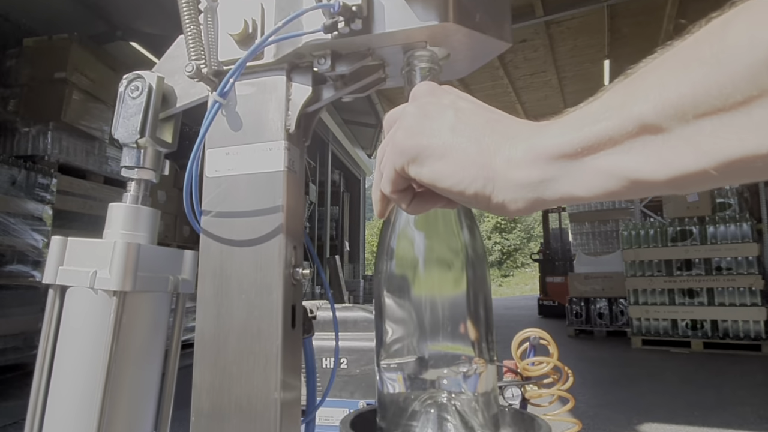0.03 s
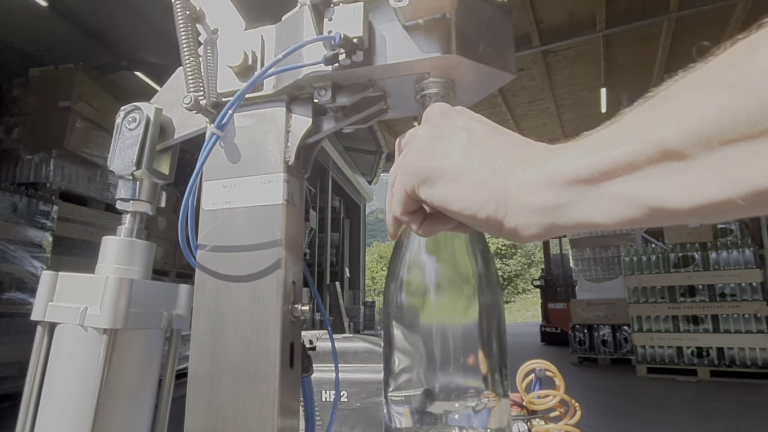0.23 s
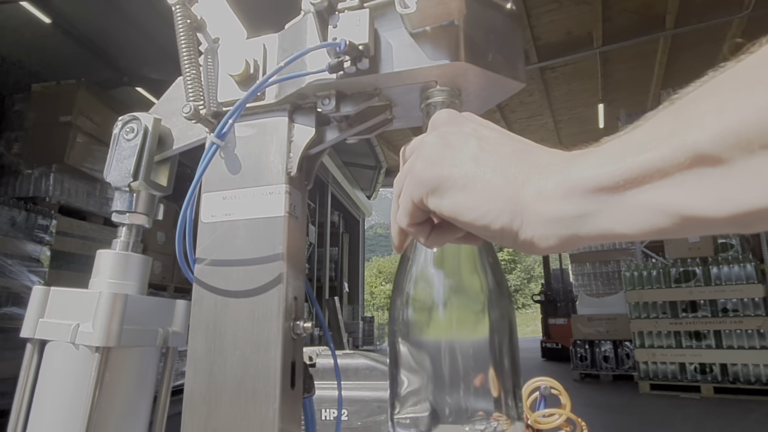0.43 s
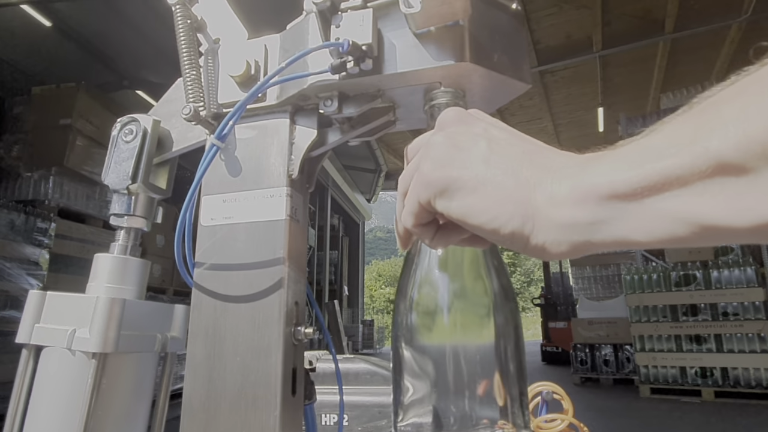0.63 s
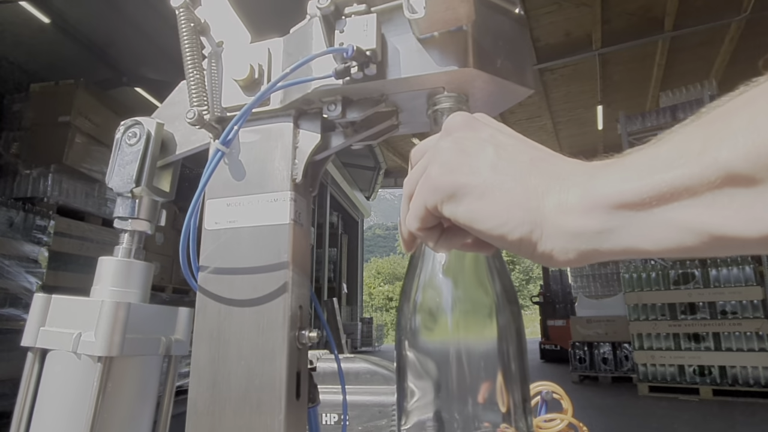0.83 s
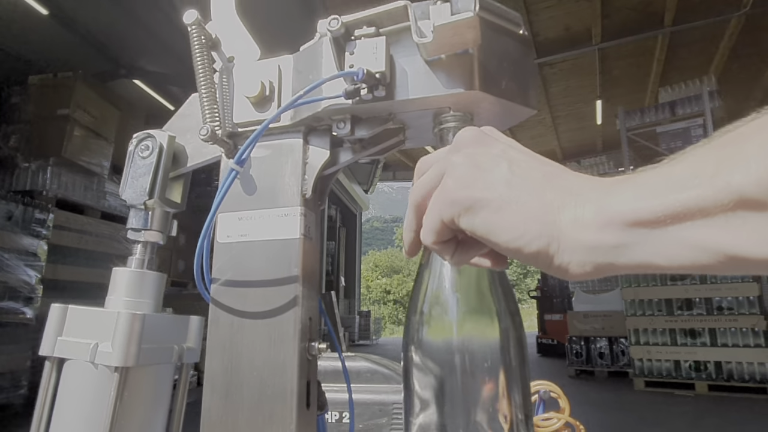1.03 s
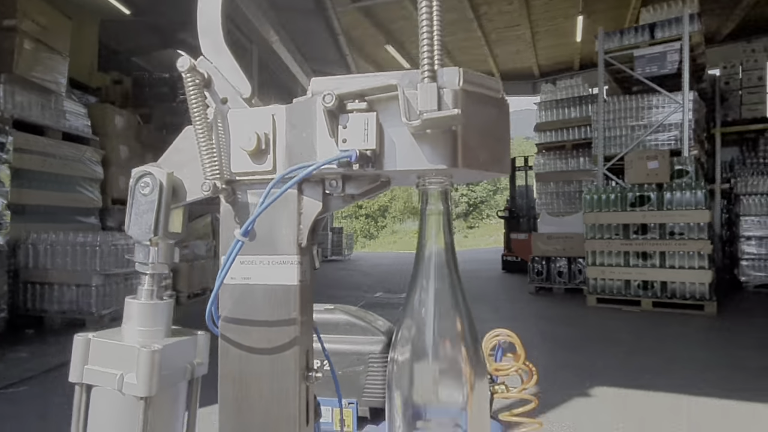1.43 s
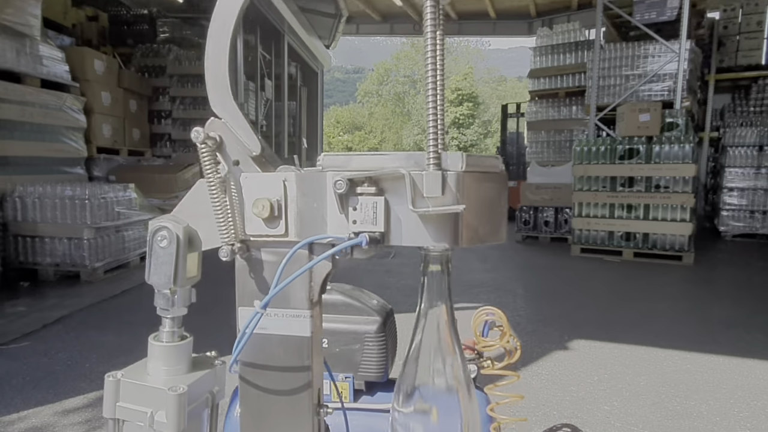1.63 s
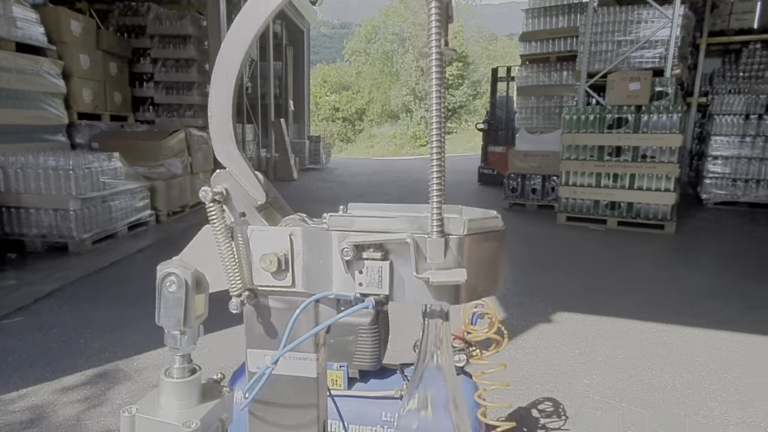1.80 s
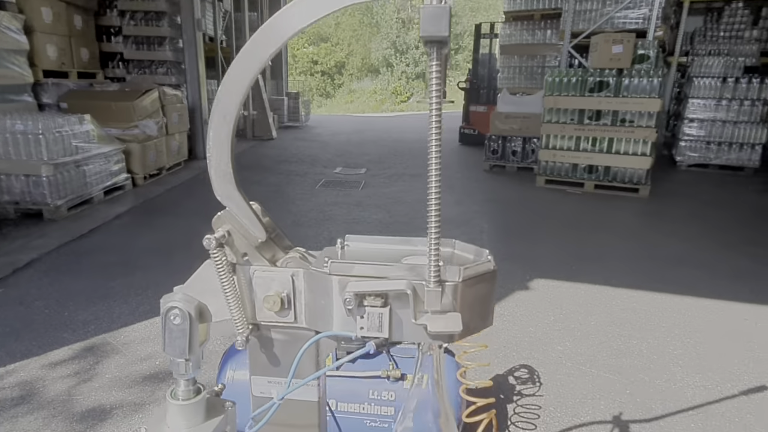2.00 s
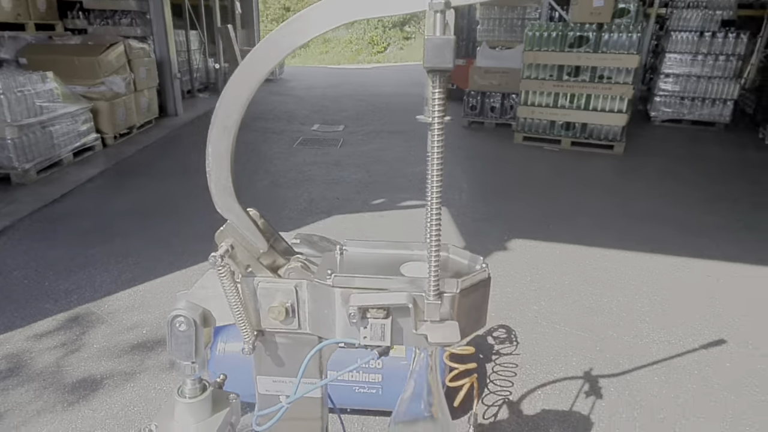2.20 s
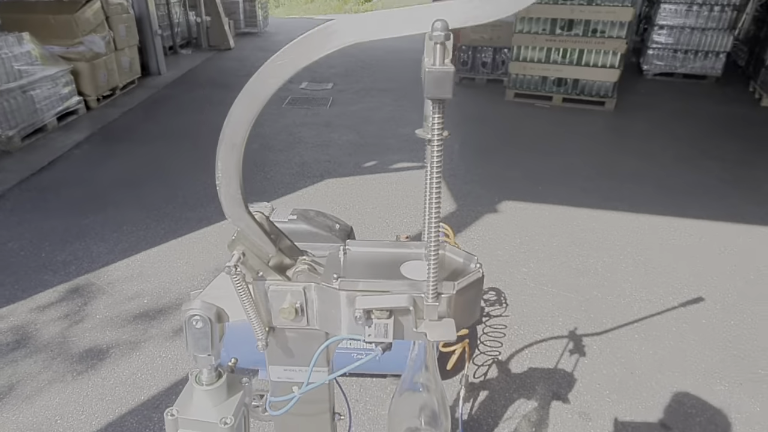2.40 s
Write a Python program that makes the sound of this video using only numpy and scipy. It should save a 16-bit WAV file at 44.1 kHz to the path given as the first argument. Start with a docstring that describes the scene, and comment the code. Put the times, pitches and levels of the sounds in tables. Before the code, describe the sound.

A glass bottle taps a steel machine and lands with a sharp, ringing knock at about 0.2 seconds, then clinks three times, settling by 0.6. From 1.1 to 1.7 seconds, valves release four soft, whistling puffs of air while a lever slides with a low rumble. Faint squeaks and light rattles follow from 2 to 2.5 seconds. Quiet outdoor noise and a low hum lie underneath.

```python
"""A glass bottle is set into a pneumatic steel machine at the open side of a storage hall.
Its impacts excite damped modes: it chatters against the steel head, lands with a knock that
rings the frame, and clinks three times as it settles. Valves puff air that hisses and whistles
in the air line's resonances. A lever slides open with a friction rumble, its hinge squeaks and
loose parts rattle, all over outdoor noise, a low hum and a faint air leak."""
import sys
import numpy as np
from scipy import signal
from scipy.fft import rfft, irfft
from scipy.io import wavfile

SR = 44100
rng = np.random.default_rng(int(sys.argv[2]) if len(sys.argv) > 2 else 0)


def materialize(psi):
    """Save the field psi as 16-bit PCM at rate SR to the path in sys.argv[1].

    A 1-D psi becomes a single channel; in a 2-D psi each row is a channel.
    """
    bounded = np.clip(np.atleast_2d(psi).T, -1, 1)
    quanta = np.round(bounded * 32767).astype(np.int16)
    wavfile.write(sys.argv[1], SR, quanta)


N = 112454
T = np.arange(N) / SR
HZ = np.fft.rfftfreq(N, 1 / SR)

# likeness of left and right in a diffuse field (f/Hz, correlation)
DIFFUSE_CORRELATION = [(30, .93), (200, 0.93), (500, 0.72), (1200, 0.17), (3000, 0.067), (16000, 0.033)]
# reverberation time of the hall (f/Hz, T60/s)
HALL_DECAY = [(100, 1), (1000, 0.44), (4000, 0.27), (8000, 0.49), (16000, 0.34)]
# spectrum of the valve hiss and of the small ticks (f/Hz, level/dB)
BRIGHT_SPECTRUM = [(200, -13.5), (700, -8.5), (1400, -5.5), (2200, -5), (3100, 0.5), (4300, -2.5),
                   (5500, -7.5), (6700, -11), (8000, -20), (9200, -16.5), (10500, -25.5), (12000, -23),
                   (16000, -43.5)]


def amp(db):
    """Amplitude ratio of a level in decibels."""
    return 10 ** (np.asarray(db) / 20)


def unit(x):
    """Normalisation to rms 1."""
    return x / np.sqrt(np.mean(abs(x) ** 2) + 1e-20)


def read(points, hz):
    """Interpolation on a logarithmic frequency axis."""
    f, value = np.transpose(points)
    return np.interp(np.log(hz + 1), np.log(f + 1), value)


def add(mix, s, sound):
    """Superposition of a stereo sound onto the mix at time s."""
    part = mix[:, max(round(s * SR), 0):][:, :sound.shape[1]]
    part += sound[:, :part.shape[1]]


def pan(db):
    """Left and right gains for an interaural level difference."""
    return amp(np.array([[db], [-db]]) / 2)


def tilt(hz, db_per_octave):
    """Spectral slope in dB, pivoting at 3 kHz and flat below 1 kHz."""
    return db_per_octave * np.log2(np.maximum(hz, 1000) / 3000)


def noise(spectrum, correlation, slope=0):
    """Partly coherent stereo noise: the right side mixes the left with independent noise."""
    left, other = rfft(rng.standard_normal((2, N)))
    c = np.clip(correlation, -1, 1)
    right = c * left + np.sqrt(1 - c * c) * other
    return unit(irfft(np.array([left, right]) * amp(read(spectrum, HZ) + tilt(HZ, slope)), N))


def resonant(peaks):
    """Resonances (f/Hz, width/Hz, level/dB) driven by stereo white noise."""
    gain = sum(amp(db) / (1 + (2 * (HZ - hz) / width) ** 2) ** .75 for hz, width, db in peaks)
    return unit(irfft(rfft(rng.standard_normal((2, N))) * gain, N))


def wander(rate_hz):
    """Random modulation: bounded low-pass noise of rms near 1."""
    slow = irfft(rfft(rng.standard_normal(N)) / (1 + (HZ / rate_hz) ** 4), N)
    return np.clip(unit(slow), -2, 2)


def highpass(x, hz):
    """Third-order attenuation of the bass below hz."""
    return signal.sosfilt(signal.butter(3, hz, "high", fs=SR, output="sos"), x)


def click(spectrum, pan_db, lag_ms, slope=0, size=2048):
    """A minimum-phase impulse that arrives lag_ms later on the right."""
    hz = np.fft.rfftfreq(size, 1 / SR)
    log_gain = np.log(amp(read(spectrum, hz) + tilt(hz, slope)))
    response = np.exp(signal.hilbert(np.r_[log_gain, log_gain[-2:0:-1]]).conj())[:len(hz)]
    delay = np.exp(-2j * np.pi * hz * lag_ms / 1000)
    pulse = irfft(np.array([response, response * delay]))[:, :size // 2]
    return pan(pan_db) * pulse / abs(pulse).max()


def contacts(rows, spectrum, pan_db, lag_ms):
    """Impact transients, one click per row (t/s, level/dB, ..., slope/(dB/octave))."""
    out = np.zeros((2, N))
    for s, db, *_, slope in rows:
        add(out, s, amp(db) * click(spectrum, pan_db, lag_ms, slope))
    return out


def ring(modes, lag_ms):
    """Free vibration after a blow: a sum of exponentially damped modes."""
    t = np.maximum(T[:SR] - np.array([[0], [lag_ms / 1000]]), 0)
    return sum(pan(side) * amp(db - 60 * t / t60) * np.sin(2 * np.pi * hz * t)
               for hz, db, t60, side in modes)


def blows(rows, sound):
    """Linear response to repeated blows: the same sound at each (t/s, level/dB)."""
    out = np.zeros((2, N))
    for s, db in rows:
        add(out, s, amp(db) * sound)
    return out


def swells(rows):
    """Tones with random phase modulation under Gaussian envelopes."""
    out = np.zeros(N)
    for s, width, hz, db in rows:
        phase = 2 * np.pi * hz * T + hz / 2000 * wander(60) + 0.2 * wander(4.9)
        out += amp(db) * np.exp(-.5 * ((T - s) / width) ** 2) * np.sin(phase)
    return out


def echo(x, t60, delay_s):
    """Diffuse reverberation: convolution with decaying noise that fades in around delay_s."""
    diffuse = noise([(1, 0), (SR, 0)], read(DIFFUSE_CORRELATION, HZ))[:, :SR]
    hz, t, bands = signal.stft(diffuse, SR, nperseg=256)
    decay = amp(-60 * t / read(t60, hz)[:, None])
    tail = signal.istft(bands * decay, SR, nperseg=256)[1][:, :SR]
    tail *= np.clip(T[:SR] / delay_s - .5, 0, 1)
    return signal.fftconvolve(x[:1], tail / np.linalg.norm(tail[0]), axes=1)[:, :N]


def space(x, near_db, hall_db):
    """Direct sound, early reflections off the machine and late reverberation from the hall."""
    # decay of reflections among the machine's parts (f/Hz, T60/s)
    near_decay = [(100, 0.63), (1000, 0.21), (4000, 0.17), (16000, 0.11)]
    early = amp(near_db) * echo(x, near_decay, delay_s=0.00067)
    return x + early + amp(hall_db) * echo(x, HALL_DECAY, delay_s=0.06)


def background():
    """Diffuse outdoor noise, a hum modulated in amplitude and phase, and a faint air leak."""
    # spectra of the outdoor noise and of the leak (f/Hz, level/dB)
    yard_spectrum = [(20, -5), (50, 2), (80, -4.5), (125, -11.5), (180, -5.5), (250, -11.5), (330, -5.5),
                     (450, -15.5), (700, -15.5), (1200, -26.5), (2100, -23), (3600, -23.5), (6000, -33),
                     (9000, -48.5), (12000, -73.5), (16000, -68)]
    leak_spectrum = [(100, 3.5), (300, 6), (700, -3.5), (1500, -2), (3400, -4), (5000, -9.5), (7000, -14.5),
                     (9000, -18.5), (12000, -26), (16000, -44)]
    # harmonics of the hum (f/Hz, level/dB)
    harmonics = [(49, -55), (98, -62)]
    # envelope of the leak (t/s, level/dB)
    leak_envelope = [(0, -44.5), (.2, -53), (.75, -57), (1.1, -59.5), (1.75, -52), (1.95, -54), (2.2, -53),
                     (2.42, -50.5), (2.55, -52.5)]
    correlation = read(DIFFUSE_CORRELATION, HZ)
    outdoors = amp(-47.85 + 1.1 * wander(3.8)) * noise(yard_spectrum, correlation)
    hum = sum(amp(db) * (1 + .35 * wander(6)) * np.sin(2 * np.pi * hz * T + .6 * wander(3))
              for hz, db in harmonics)
    leak_db = np.interp(T, *np.transpose(leak_envelope)) + 0.44 * wander(30)
    return outdoors + hum + pan(db=1) * amp(leak_db) * noise(leak_spectrum, correlation)


def valves():
    """Escaping air excites resonances of the line and exhaust port; the line whistles and rings on."""
    # puffs of air (start/s, rise/s, hold/s, fall/(dB/s), hiss/dB, whistle/dB,
    # hiss slope/(dB/octave), line noise/dB, port noise/dB)
    puffs = [(-.03, 0.0046, 0.019, 166, -38.5, -58, -0.5, -56, -45.5),
             (1.118, 0.014, 0.046, 116, -39, -36, -0.5, -34, -53),
             (1.297, 0.0069, 0.02, 106, -42.5, -81, -1, -61, -53),
             (1.395, 0.035, 0.046, 130, -44.5, -62, 1.8, -51, -54),
             (1.543, 0.022, 0.055, 137, -41.5, -53.5, 2.5, -51, -39.5)]
    # modes of the air line (f/Hz, level/dB, left-right/dB, fall/(dB/s))
    line_modes = [(1685, -9, 0, 55), (2263, 1, 3, 135), (2471, 0, 2, 155), (3255, -14, 2, 110),
                  (3690, -13, 2, 110), (4007, -11, 3, 100), (4130, -14, 2, 110), (4467, -14, 2, 100),
                  (5000, -17, 2, 120), (5640, -22, 0, 130), (6650, -20, 0, 130), (6900, -22, 0, 130),
                  (9120, -26, 0, 130)]
    # resonances of the exhaust port (f/Hz, width/Hz, level/dB)
    port_resonances = [(1650, 28, -5), (2430, 50, -1), (2760, 170, -4), (3190, 150, -2), (3880, 60, -9),
                       (4540, 140, -12)]
    line_width_hz, flutter_depth = 40, .18
    tones = []
    for hz, db, side, ring_fall in line_modes:
        pair = [(1 + flutter_depth * wander(27)) * np.sin(2 * np.pi * hz * T + .5 * wander(19))
                for _ in range(2)]
        tones.append((pan(side) * amp(db) * np.array(pair), ring_fall))
    line = resonant([(hz, line_width_hz, db) for hz, db, *_ in line_modes])
    port = resonant(port_resonances)
    out = np.zeros((2, N))
    for start, rise, hold, fall, hiss_db, whistle_db, slope, line_db, port_db in puffs:
        opening = np.clip((T - start) / rise, 0, 1)
        closed_s = np.maximum(T - start - rise - hold, 0)
        hiss = noise(BRIGHT_SPECTRUM, correlation=0.05, slope=slope) * amp(hiss_db + .8 * wander(99))
        flow = hiss + amp(line_db) * line + amp(port_db) * port
        whistle = sum(tone * amp(-ring_fall * closed_s) for tone, ring_fall in tones)
        out += opening * (pan(db=1.5) * flow * amp(-fall * closed_s) + amp(whistle_db - 2) * whistle)
    return out + amp(-22.5) * echo(out, HALL_DECAY, delay_s=.03)


def head_chatter():
    """Contact damping: each tap on the steel head replaces its ring, and the seated bottle stills it."""
    # taps of the bottle (t/s, click/dB, ring/dB, slope/(dB/octave))
    taps = [(0.1643, -27, -46.5, 2.5), (0.2139, -5, -14, 1), (.2188, -29, -10.5, -4)]
    # spectrum of a tap (f/Hz, level/dB)
    tap_spectrum = [(100, -20.5), (500, -3.5), (1000, 3.5), (1900, 2), (2600, -11.5), (4500, -3.5),
                    (7000, -22.5), (11000, -35.5), (16000, -31.5)]
    # modes of the head (f/Hz, level/dB, T60/s, left-right/dB)
    head_modes = [(3465, 0, .11, 5), (1560, -13, .03, 3), (2089, -22, .07, 4), (2955, -20, .07, 3),
                  (5157, -22, .03, 3), (7413, -38, .06, 0), (11150, -38, .02, 0)]
    seated_s, seated_t60_s, handover_s = 0.23, 0.044, 0.0013
    clicks = contacts(taps, tap_spectrum, pan_db=5, lag_ms=.07)
    tone = ring(head_modes, lag_ms=0)
    rings = np.zeros((2, N))
    next_taps = [s for s, *_ in taps[1:]] + [np.inf]
    for (s, _, db, _), end in zip(taps, next_taps):
        rings += blows([(s, db)], tone) * np.clip(1 - (T - end) / handover_s, 0, 1)
    rings *= amp(-60 * np.maximum(T - seated_s, 0) / seated_t60_s)
    return space(clicks, near_db=-1, hall_db=-22) + space(rings, near_db=-17, hall_db=-32)


def landing_knock():
    """Impact excitation: the bottle lands on its plate, the frame rings and the stand sways."""
    # landing and bounces (t/s, click/dB, ring/dB, slope/(dB/octave))
    knocks = [(0.2381, -11, -25, 4), (0.2397, -2.5, -4.5, -0.5), (.2432, -35, -46, 6),
              (0.2495, -14, -13.5, -0.5), (.2530, -23, -35, 1)]
    # spectrum of a knock (f/Hz, level/dB)
    knock_spectrum = [(60, -10), (250, -14), (450, -13), (620, -8), (850, 1), (1100, 1), (1600, -5),
                      (2100, -3), (2600, -9), (4000, -4), (5500, -14), (7000, -22), (9500, -20),
                      (12000, -23), (16000, -35)]
    # modes of the frame (f/Hz, level/dB, T60/s, left-right/dB)
    frame_modes = [(578, -42, .45, 2), (635, -37, .3, 2), (753, -25, .25, 2), (963, -12, .13, 3),
                   (1013, -25, .21, 3), (1274, -21, .14, 4), (2082, -18, .14, 6), (2961, -30, .18, 2),
                   (3068, -32, .17, 2), (3392, -23, .2, -1), (900, -10, .012, 2), (1130, -4, .012, 3),
                   (3636, -26, .2, -2), (4350, -36, .18, 0)]
    # sway of the stand (centre/s, width/s, f/Hz, level/dB)
    sway = [(.27, .035, 91, -47.5)]
    clicks = contacts(knocks, knock_spectrum, pan_db=2.5, lag_ms=0.11)
    rings = blows([(s, db) for s, _, db, _ in knocks], ring(frame_modes, lag_ms=0.031))
    rings = highpass(rings, hz=635)
    return space(clicks, near_db=3, hall_db=-31) + space(rings, near_db=-10, hall_db=-21.5) + swells(sway)


def bottle_clinks():
    """Free vibration of the settling glass; softer contacts excite less treble."""
    # contacts of the glass (t/s, click/dB, ring/dB, slope/(dB/octave))
    clinks = [(0.33, -8.5, -24.5, 3), (0.4818, -23.5, -42.5, -5), (0.594, -23, -36.5, -5.5)]
    # spectrum of a contact (f/Hz, level/dB)
    clink_spectrum = [(100, -13.5), (400, -10), (750, 7.5), (1500, 2.5), (2500, 0), (4000, 9), (5800, -9),
                      (7500, -9), (11000, -38), (16000, -67)]
    # modes of the bottle, the lowest two beating (f/Hz, level/dB, T60/s, left-right/dB)
    glass_modes = [(3635, -1, .18, -3), (3689, 0, .26, -2), (3900, -7, .06, 0), (4250, -10, .04, 2),
                   (6638, -16, .2, 0), (7550, -13, .04, 0), (9318, -27, .15, -3), (10950, -21, .09, 0),
                   (11560, -18, .1, 0), (14300, -33, .08, 0)]
    clicks = contacts(clinks, clink_spectrum, pan_db=9, lag_ms=0.088)
    rings = np.zeros((2, N))
    for s, _, ring_db, slope in clinks:
        excited = [(hz, db + tilt(hz, slope), t60, side) for hz, db, t60, side in glass_modes]
        add(rings, s, amp(ring_db) * ring(excited, lag_ms=0.054))
    return space(clicks, near_db=-5, hall_db=-22) + space(rings, near_db=-14, hall_db=-40)


def lever():
    """Sliding friction drives the lever's resonances; the frame drones and the hinge squeaks."""
    # envelope of the slide (t/s, level/dB)
    slide_envelope = [(1.0, -80), (1.2, -55.5), (1.33, -53.5), (1.395, -46), (1.425, -36.5), (1.47, -37),
                      (1.515, -45), (1.59, -44.5), (1.69, -50.5), (1.8, -57.5), (2.55, -58)]
    # spectrum of the friction (f/Hz, level/dB)
    friction_spectrum = [(40, -24.5), (100, -4), (170, 9.5), (280, -0.5), (450, 2.5), (900, -8.5),
                         (1300, -4), (2200, -5), (5000, -29.5), (16000, -57.5)]
    # resonances of the lever (f/Hz, width/Hz, level/dB)
    lever_resonances = [(140, 30, -2), (197, 20, -1), (283, 16, 0), (368, 20, -3), (490, 30, -8),
                        (610, 30, -4), (796, 40, -1), (868, 30, 1), (940, 30, 1), (1100, 60, -6)]
    # tones of the frame and of the hinge (centre/s, width/s, f/Hz, level/dB)
    drones = [(1.598, 0.023, 210.4, -37.5), (1.985, 0.037, 183.2, -43.5), (2.085, 0.035, 171.4, -44.5),
              (2.42, 0.054, 178, -48.5)]
    squeaks = [(2.125, 0.012, 3620, -55.5), (2.185, .025, 3230, -58), (2.49, 0.022, 4340, -54)]
    friction = amp(-2) * noise(friction_spectrum, read(DIFFUSE_CORRELATION, HZ))
    body = amp(-6.5) * resonant(lever_resonances)[:1]
    slide_db = np.interp(T, *np.transpose(slide_envelope)) + 1.4 * wander(100)
    return (friction + body) * amp(slide_db) + swells(drones) + swells(squeaks)


def loose_parts():
    """Impact transients: the lever's loose parts rattle, with two small bright ticks."""
    # impacts of the parts (t/s, level/dB, slope/(dB/octave))
    impacts = [(1.333, -40, -12), (1.361, -32, -6), (1.371, -32, -18), (1.388, -44, -2), (1.719, -40, -4),
               (2.008, -39, -3), (2.286, -28.5, -1), (2.299, -49, 10), (2.316, -29.5, -2),
               (2.338, -38.5, 1), (2.347, -57, 0), (2.357, -29.5, -1), (2.368, -40, 6), (2.398, -28.5, 7),
               (2.414, -37, -4)]
    # spectrum of an impact (f/Hz, level/dB)
    impact_spectrum = [(80, -8), (300, -6.5), (700, -2.5), (1100, -0.5), (1550, -3.5), (2000, -0.5),
                       (3000, -11.5), (5000, -21), (9000, -54), (16000, -47)]
    # bright ticks (t/s, level/dB)
    tick_events = [(2.022, -35), (2.480, -32)]
    rattles = contacts(impacts, impact_spectrum, pan_db=5.5, lag_ms=0)
    ticks = blows(tick_events, click(BRIGHT_SPECTRUM, pan_db=3, lag_ms=0.042))
    return space(rattles + ticks, near_db=-1, hall_db=-11)


def scene():
    """Superposition of all sources."""
    return (background() + valves() + head_chatter() + landing_knock() + bottle_clinks()
            + lever() + loose_parts())


def record(dry):
    """Bass cut, clipping at full scale and band limiting."""
    limited = np.clip(highpass(dry, hz=44), -1, 1)
    lowpass = signal.firwin(511, cutoff=15900, window=("kaiser", 9), fs=SR)
    return signal.oaconvolve(limited, lowpass[None], "same")


dry = scene()
out = record(dry)
materialize(out)
```